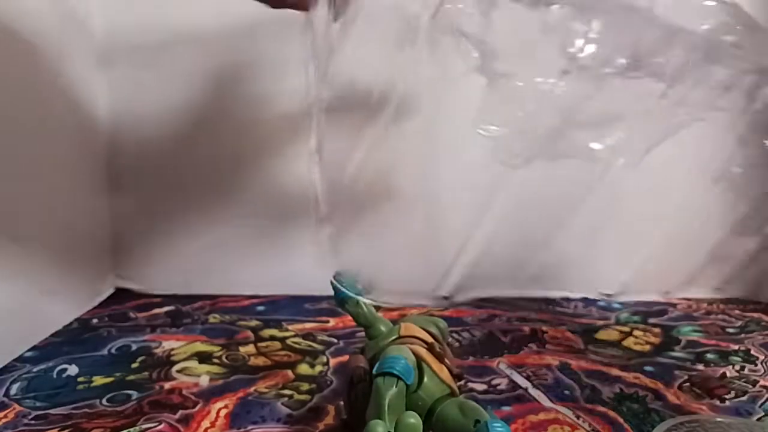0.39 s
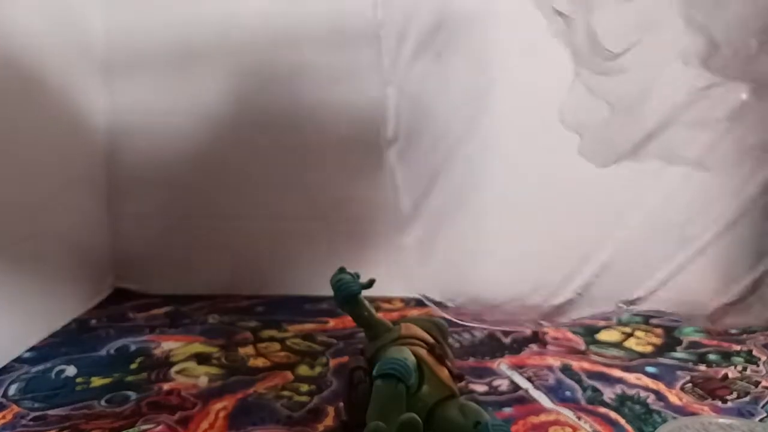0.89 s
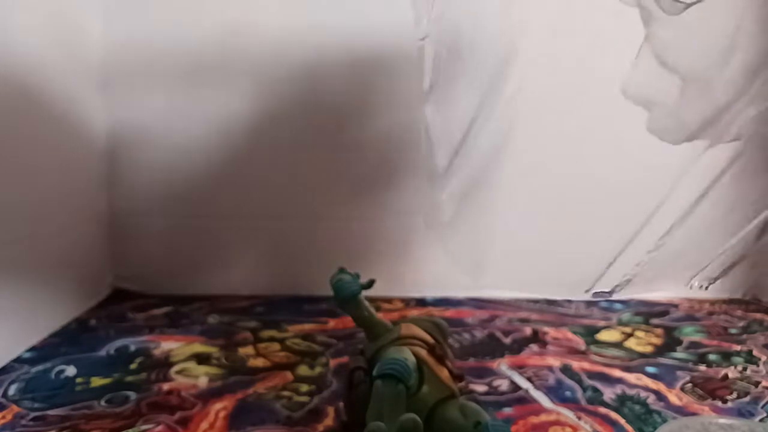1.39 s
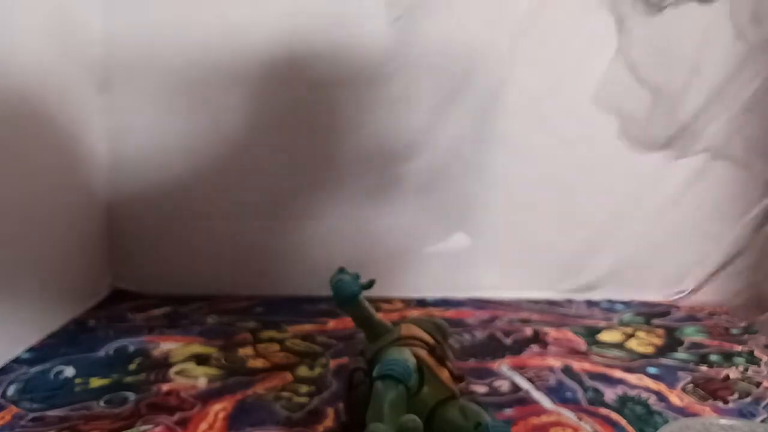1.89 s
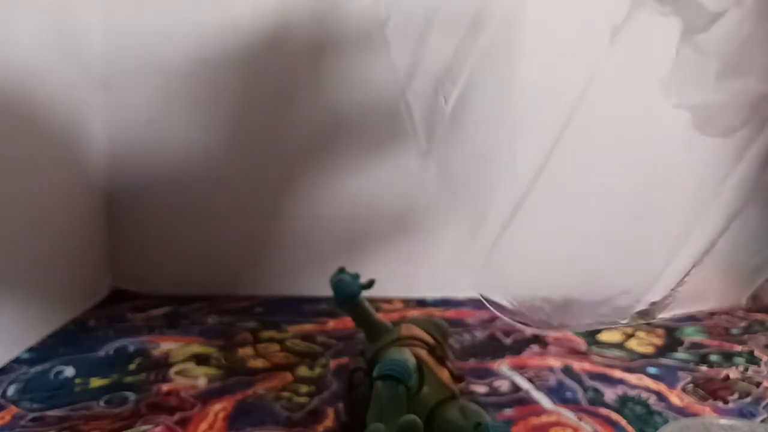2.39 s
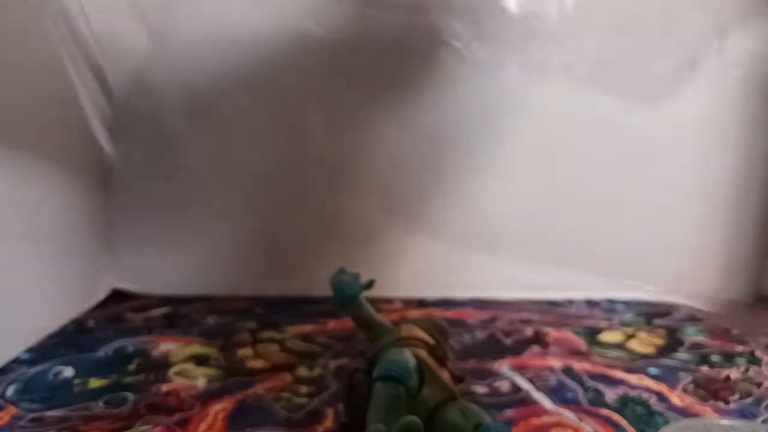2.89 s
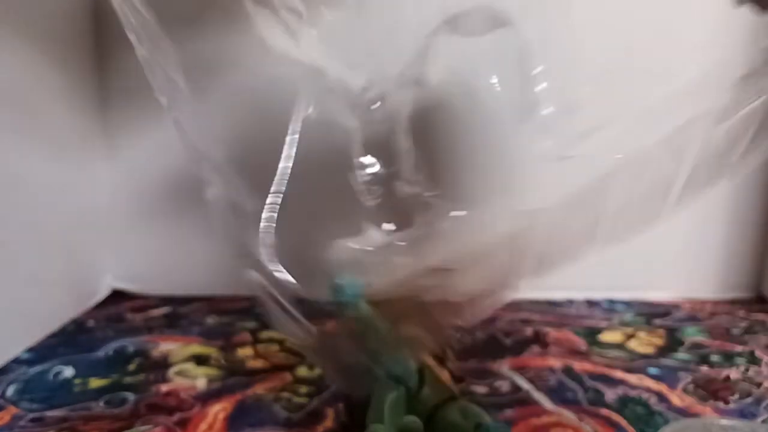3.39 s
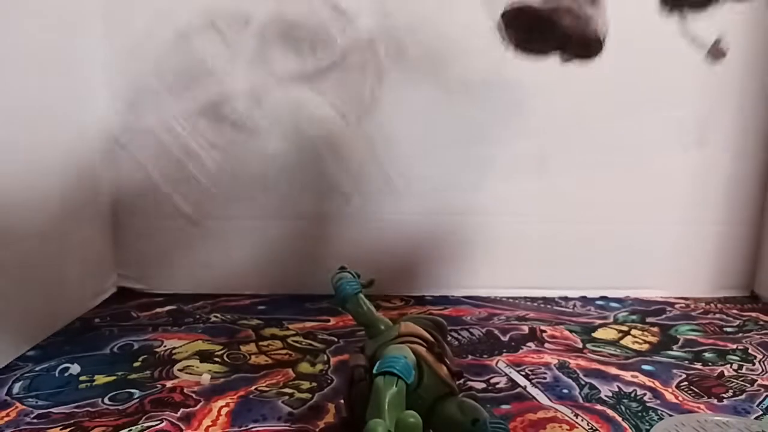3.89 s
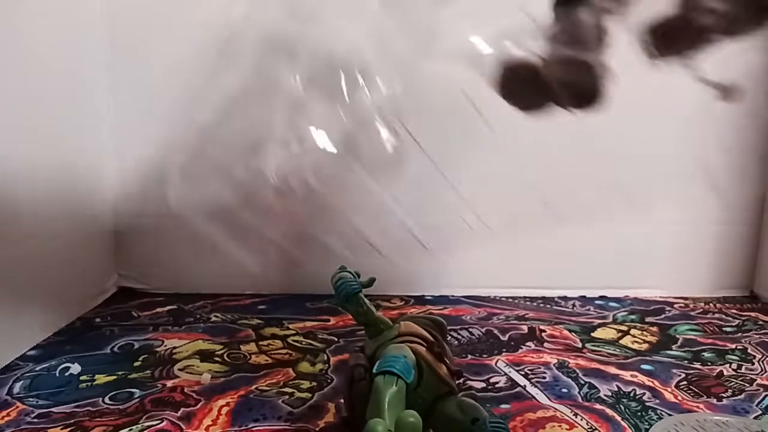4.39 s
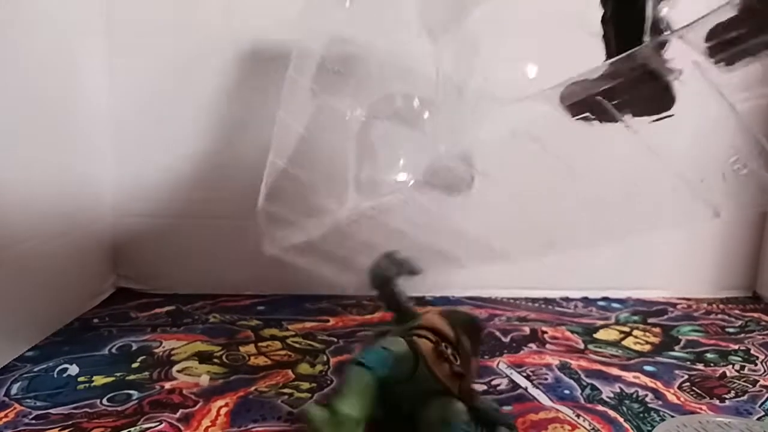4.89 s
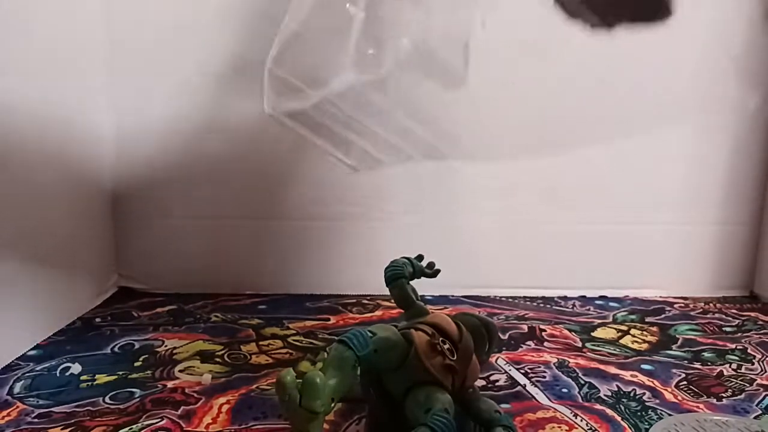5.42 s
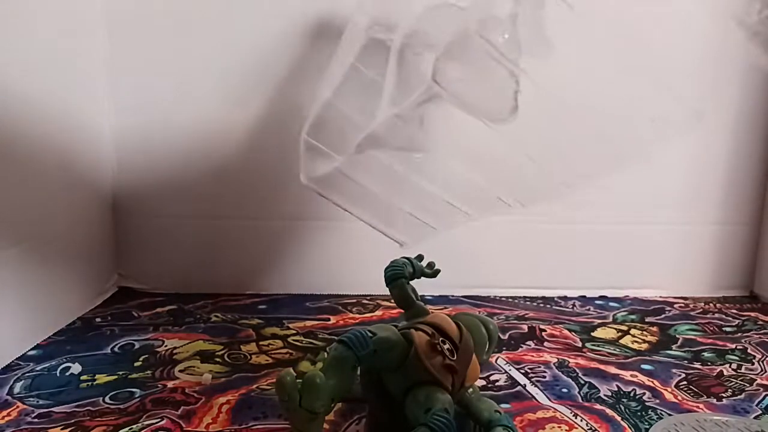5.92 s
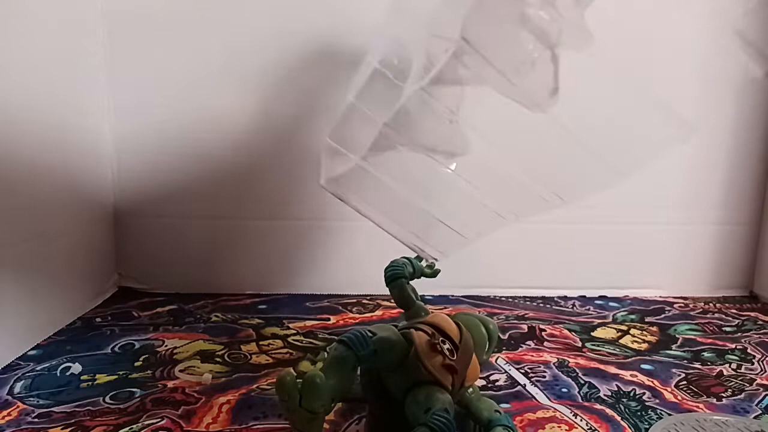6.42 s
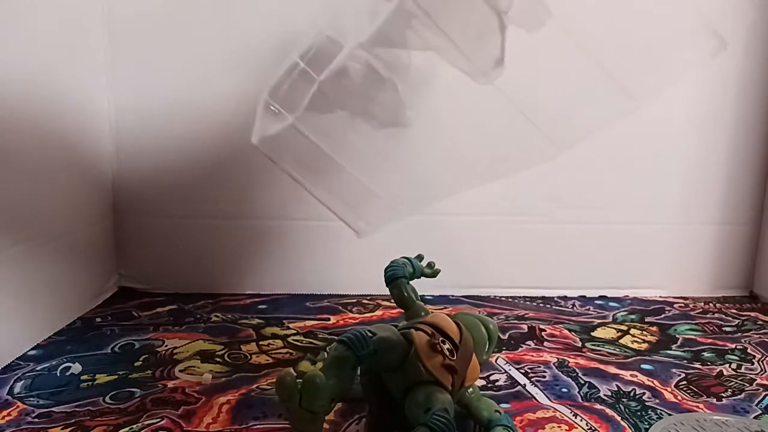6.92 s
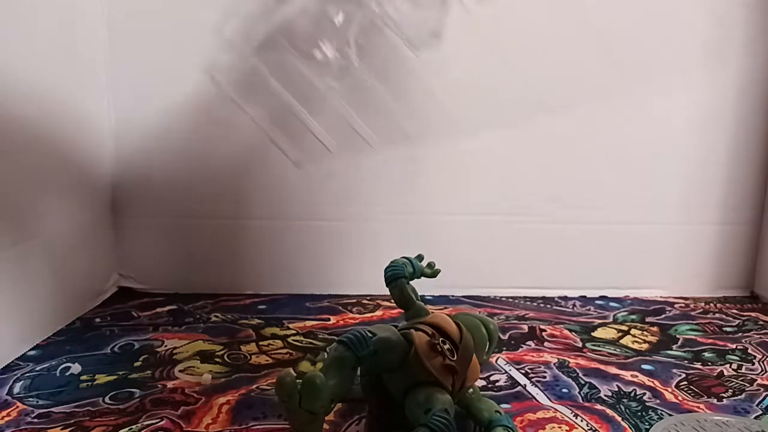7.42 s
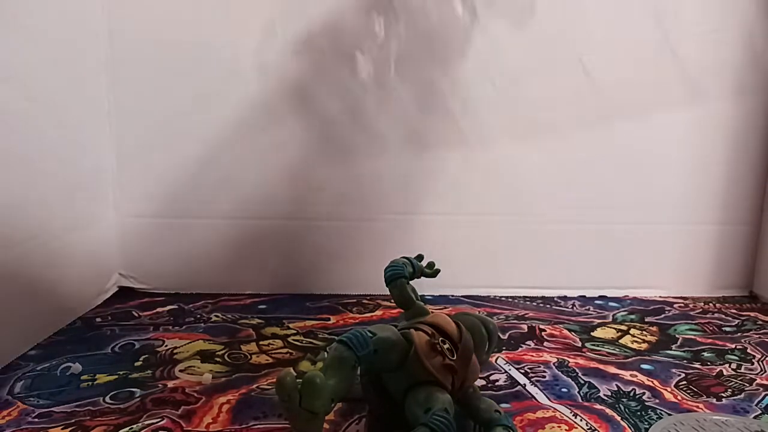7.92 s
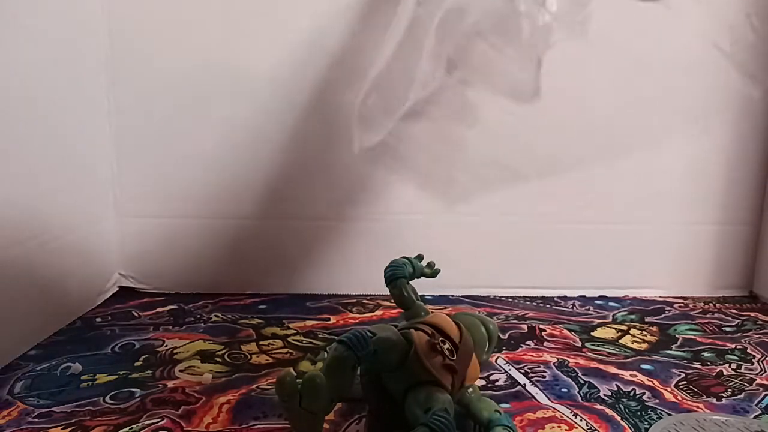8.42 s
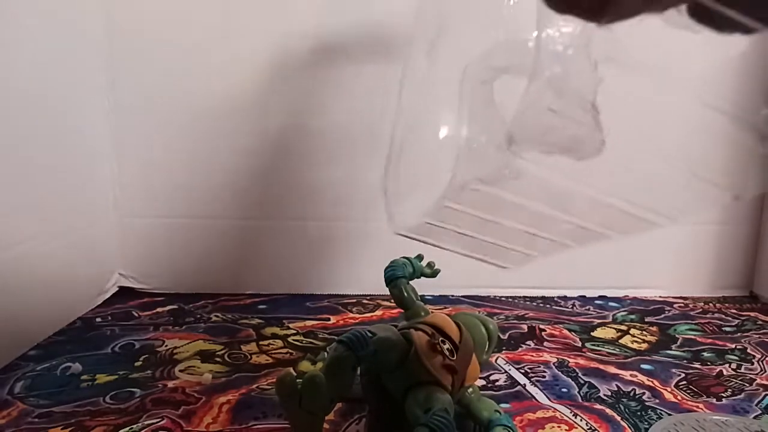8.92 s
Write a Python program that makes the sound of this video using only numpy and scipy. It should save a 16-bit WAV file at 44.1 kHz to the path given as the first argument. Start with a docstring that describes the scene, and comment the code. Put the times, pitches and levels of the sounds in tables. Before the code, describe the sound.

Faint ticks over a low wavering hum, then hard plastic packaging pops, cracks and scrapes loudly in uneven clusters inside a small box.

```python
"""A faint rustle with a few ticks over an unsteady hum opens the scene, then a hard, clear plastic tray is bent
and turned by hand inside a small open box, close to a stereo microphone. Its dents snap over as short noise
bursts through resonances, with treble cracks and booms of the tray; the box answers them with a noise tail.
Fingers and edges rustle and slide as shaped noise and grains, and low decaying sines thud in the table.
Under it all lie room noise and two close hums that beat."""
import sys
import numpy as np
from scipy import signal
from scipy.fft import rfft, irfft, next_fast_len
from scipy.io import wavfile
from scipy.ndimage import uniform_filter1d, map_coordinates

SR = 44100
rng = np.random.default_rng(int(sys.argv[2]) if len(sys.argv) > 2 else 0)


def convert_level_to_amplitude(level_db):
    """Map a level in decibels to its linear amplitude factor."""
    exponent = np.asarray(level_db, float) / 20
    return 10 ** exponent


def digitize_waveform(pressure):
    """Quantize a signal to 16-bit integers and store it at the path in sys.argv[1].

    Rows of a 2-D input are taken as channels; values are limited to [-1, 1].
    """
    field = np.atleast_2d(pressure).T
    bounded = np.clip(field, -1, 1)
    quanta = np.round(bounded * 32767).astype(np.int16)
    wavfile.write(sys.argv[1], SR, quanta)


N = 399088  # length in samples

# Treble colour of cracks and fizz: freq_hz [Hz], level_db [relative dB per Hz]
CRACK_COLOUR = [(1500, -14.5), (5000, -0.5), (8500, -4.5), (9500, -11), (12500, -4), (15500, -11.5)]
# Colour of the dragging scrape and its crackles: freq_hz [Hz], level_db [relative dB per Hz]
SCRAPE_COLOUR = [(150, -29), (350, 8.5), (580, -9), (1500, -6), (4000, -16), (8000, -39)]


def unit(x):
    """Scale to rms 1."""
    return x / np.sqrt(np.mean(x ** 2) + 1e-20)


def along(points, hz):
    """Read (Hz, value) points on a log frequency axis."""
    freq_hz, value = np.transpose(points)
    return np.interp(np.log(hz + 1), np.log(freq_hz + 1), value)


def wobble(rate):
    """A smooth random curve with rate knots a second."""
    knots = rng.standard_normal(int(N * rate / SR) + 4)
    return map_coordinates(knots, [np.arange(N) * rate / SR])


def filtered(x, response):
    """Pass x through a complex response of frequency."""
    m = next_fast_len(N + SR // 2)
    return irfft(rfft(x, m) * response(np.fft.rfftfreq(m, 1 / SR)), m)[..., :N]


def resonance(f, hz, width_hz):
    """Causal response of one damped mode."""
    return 1j * f * width_hz / (hz * hz - f * f + 1j * f * width_hz)


def hiss(spectrum):
    """Coloured stereo noise of rms 1 whose left-right likeness changes with frequency."""
    # Stereo likeness: freq_hz [Hz], likeness [correlation 0-1]
    likeness = [(60, 0.24), (250, 0.9), (600, 0.021), (1500, 0.68), (6000, 0.011)]

    def mid_side(hz):
        angle = np.arccos(np.clip(along(likeness, hz), -1, 1)) / 2
        return convert_level_to_amplitude(along(spectrum, hz)) * [np.cos(angle), np.sin(angle)]

    mid, side = filtered(rng.standard_normal((2, N)), mid_side)
    return unit(np.array([mid + side, mid - side]))


def room():
    """Unsteady room noise, and two motors humming a little apart so that their tones beat."""
    # Room noise colour: freq_hz [Hz], level_db [relative dB per Hz]
    air_colour = [(20, -29), (60, -2.5), (120, -14.5), (190, -10), (370, -6), (580, -28.5), (1600, -22.5),
                  (2800, -38), (15800, -48.5)]
    # Hum pair: upper pitch_hz [Hz], beat_rate [per s], crest_s [time of a beat crest, s]
    hum_pair = (120.5, 2.364, .39)
    # Brief dip of the background: start_s [s], end_s [s], depth_db [dB]
    dip = (7.64, 7.89, -18)
    hz, beat_rate, crest_s = hum_pair
    start_s, end_s, depth_db = dip
    t = np.arange(N) / SR
    phase = 2 * np.pi * hz * t + .6 * wobble(12)  # the pitch wavers
    second = .75 * np.cos(phase - 2 * np.pi * beat_rate * (t - crest_s))
    hum = np.sqrt(2) * convert_level_to_amplitude(-67 + 1.2 * wobble(5.0)) * (np.cos(phase) + second)
    air = convert_level_to_amplitude(-65 + 3 * wobble(8)) * hiss(air_colour)
    dip_db = uniform_filter1d(depth_db * ((t > start_s) & (t < end_s)), size=900)
    return convert_level_to_amplitude(dip_db) * (air + hum)


def thuds():
    """Low pushes travel through the table into the microphone as decaying sines, stronger on the right."""
    # Pushes: start_s [s], level_db [dB at onset, before panning], pitch_hz [Hz]
    pushes = [(2.376, -33, 84.3), (2.662, -31.5, 72.3), (3.36, -33, 133), (4.499, -40, 57),
              (7.009, -21, 63.6)]
    out, t = np.zeros(N + SR), np.arange(SR // 4) / SR
    for start_s, level_db, pitch_hz in pushes:
        push = convert_level_to_amplitude(level_db - 60 * t / 0.09) * np.sin(2 * np.pi * pitch_hz * t)
        out[round(start_s * SR):][:len(t)] += push
    return out[:N] * [[.55], [1.3]]


def swishes():
    """Skin slides smoothly on the film: noise swells, hisses evenly around its band and stops."""
    # Slides: start_s [s], length_s [s], level_db [dB rms before the swell], band_hz [Hz]
    slides = [(3.057, 0.12, -50, 1510), (3.085, .085, -51.5, 3290), (3.109, 0.061, -48.5, 920),
              (5.78, 0.049, -46.5, 7100), (6.477, 0.31, -54, 4740), (8.683, .28, -52, 4950)]
    out = np.zeros((2, N))
    for start_s, length_s, level_db, band_hz in slides:
        at, size = round(start_s * SR), round(length_s * SR)
        f = np.fft.rfftfreq(size, 1 / SR)
        band = resonance(f, band_hz, 0.25 * band_hz) + 0.079 * resonance(f, 5000, 9000)
        noise = unit(irfft(rfft(rng.standard_normal((2, size))) * band, size))
        swell = np.sin(np.pi * np.arange(size) / size) ** 0.25
        out[:, at:at + size] += convert_level_to_amplitude(level_db) * swell * noise
    return out


def effort():
    """Scrape and fizz levels in dB: strokes swell fast and fade out over the tray merely held."""
    # The tray merely held: time_s [s], scrape_db [dB], fizz_db [dB]
    held = [(0, -63.5, -53.5), (.4, -86, -75.5), (2.85, -73.5, -68.5), (3.5, -82, -75), (7.5, -69, -75),
            (7.85, -92, -87), (9.05, -78, -73)]
    # Strokes of fingers and edges: start_s [s], length_s [s], scrape_db [dB], fizz_db [dB]
    strokes = [(0, 0.083, -62, -83), (0.69, 0.16, -47.5, -64.5), (0.934, 0.2, -58, -69),
               (1.069, 0.14, -41, -60), (1.361, 0.094, -63.5, -66), (1.673, 0.18, -63.5, -61.5),
               (1.892, 0.32, -64.5, -68), (2.294, 0.53, -63, -71), (2.925, 0.47, -63.5, -67.5),
               (3.121, 0.22, -47, -68), (3.759, 0.32, -52, -74), (4.161, 0.04, -40.5, -57),
               (4.365, 0.34, -50.5, -86.5), (4.8, 0.3, -47, -59.5), (5.22, 0.11, -44.5, -55),
               (5.46, 0.4, -50, -60), (5.962, 0.19, -44.5, -48), (6.426, 0.34, -49.5, -52.5),
               (6.824, 0.33, -66.5, -75.5), (7.128, 0.21, -52.5, -61), (7.877, 0.49, -52, -88),
               (8.41, 0.28, -49.5, -91), (8.712, 0.23, -51.5, -55)]
    grip_s, let_go_db_per_s = 0.061, 165
    t = np.arange(0, N / SR + .01, .002)
    held_s, *held_db = np.transpose(held)
    start, length, *stroke_db = np.transpose(strokes)[:, :, None]
    swell = np.clip((t - start) / grip_s, 0, 1)
    shape = swell * convert_level_to_amplitude(-let_go_db_per_s * np.clip(t - start - length, 0, None))
    levels = []
    for rest_db, db in zip(held_db, stroke_db):
        gain = convert_level_to_amplitude(np.interp(t, held_s, rest_db)) + (convert_level_to_amplitude(db) * shape).sum(0)
        levels.append(np.interp(np.arange(N) / SR, t, 20 * np.log10(gain)))
    return levels


def creases(rate, spread_db, t60):
    """Gain for noise that bursts at random moments and decays by 60 dB in t60 seconds."""
    starts = (rng.random(N) < rate / SR) * convert_level_to_amplitude(spread_db * rng.standard_normal(N))
    return signal.lfilter([1], [1, -convert_level_to_amplitude(-60 / (t60 * SR))], starts)


def crackles():
    """Tiny creases pop at random under a drag, each a few cycles at its own pitch and place."""
    grains_per_s, spread_db = 200, 3.5
    count = round(grains_per_s * N / SR)
    when, pitch, size, place = rng.random((4, count))[:, :, None]
    hz, k = 500 * 12 ** pitch, np.arange(512)
    cycles = hz * k / SR
    gain = hz * convert_level_to_amplitude(along(SCRAPE_COLOUR, hz) - spread_db * np.log(size + 1e-9))
    pops = gain * np.sin(2 * np.pi * cycles) * cycles * np.exp(-2 * np.pi * cycles / 6)
    at = (when * N).astype(int) + k
    lag = np.round(20 * (place - .5)).astype(int) + 10  # samples
    sides = ((lag, .5 + place), (20 - lag, 1 + .5 - place))  # (delay, gain) left and right
    return unit(np.array([np.bincount((at + late).ravel(), (pops * share).ravel(), N + SR)[:N]
                          for late, share in sides]))


def rustle(scrape_db, fizz_db):
    """Skin and edges drag on the sheet: a lumpy, crackling scrape, a crinkling fizz and a shaken table."""
    # Handling carried by the table: freq_hz [Hz], level_db [relative dB per Hz]
    shake_colour = [(25, 0), (60, -0.5), (160, -2.5), (260, -35)]
    crinkle = creases(rate=90, spread_db=5, t60=0.03)
    drag = unit(convert_level_to_amplitude(2.5 * wobble(30)) * (1 + 2 * crinkle) * hiss(SCRAPE_COLOUR))
    scrape = drag * .5 + crackles()
    fizz = unit(convert_level_to_amplitude(6.0 * wobble(32)) * (1 + 1.3 * crinkle) * hiss(CRACK_COLOUR))
    shake = convert_level_to_amplitude(.5 * scrape_db - 39.0 + 5.0 * wobble(22.0)) * hiss(shake_colour)
    return convert_level_to_amplitude(scrape_db) * scrape + convert_level_to_amplitude(fizz_db) * fizz + shake


def strays(scrape_db, fizz_db):
    """Ticks at random moments, each with its own pitch, their strength following the stroke under them."""
    ticks_per_s, over_scrape_db, spread_db = 30, 8, 3
    at = rng.integers(200, N - 200, int(ticks_per_s * N / SR))
    size, pitch, boom = rng.standard_normal((3, len(at)))
    peak_db = scrape_db[at] + over_scrape_db + spread_db * size
    crack_db = fizz_db[at] - scrape_db[at] - 8.0
    return np.transpose([at / SR, peak_db, 1500 * np.exp(.3 * pitch), -18 + 6 * boom, crack_db])


def aftershocks(rows):
    """Neighbouring creases give way: each row sets off two softer ticks with less crack as the sheet settles."""
    within_s, softer_db = .06, -15  # some fall up to 10 dB lower still
    s, db, _, boom_db, crack_db = np.transpose([*rows, *rows])
    late, size, pitch = rng.random((len(s), 3)).T
    peak_db = db + softer_db - 10 * size
    return np.transpose([s + within_s * late, peak_db, 1000 * 2 ** pitch, boom_db, crack_db - 9.5])


def snaps(stray_rows):
    """Dents buckle in bursts of a few ms that ring a few rough cycles, crack in the treble and boom the tray."""
    # Dents snapping over: peak_s [s], peak_db [dB before a random stereo tilt], pitch_hz [Hz],
    # boom_db [tray drive, dB re peak, before a common boost], crack_db [dB re peak_db]
    dents = [(0.393, -40, 406, -0.5, -50), (0.41, -38, 390, 0, -50), (0.841, -42, 1150, -3, -13),
             (1.108, -20.5, 1780, -11, -38), (1.165, -9.5, 2120, -41, -15), (1.174, -11, 2090, -39, -3),
             (1.183, -7.5, 2500, -24, -7), (1.382, -23.5, 2540, -50, -17), (2.331, -16.5, 3000, -11.5, -41),
             (2.372, -4.5, 1120, -17.5, -32), (2.405, -19, 820, -14, -35), (2.637, 0, 1710, -11, -31),
             (2.726, -37, 4630, -23, 19), (3.182, -29, 2140, -4.5, -7), (3.301, -14.5, 1720, -8, -9),
             (3.361, -19.5, 1100, -1, -12.5), (3.397, -31.5, 2280, 2.5, 3), (3.508, -40.5, 890, 4.5, -32),
             (3.604, -42, 830, 4, -46.5), (4.183, -13.5, 1130, -9.5, -17.5), (4.2, -28.5, 1300, 0.5, -27),
             (4.252, -23.5, 1200, -20, -35), (4.465, -19, 2370, -34, -7), (4.475, -14.5, 1740, -14, -21),
             (4.492, -11, 1990, -20, -32), (4.508, -18.5, 3500, -3, 7), (4.832, -17, 3040, -12, -23),
             (4.853, -20.5, 1530, -10, -12.5), (5.022, -29.5, 1040, 1, -18.5), (5.05, -28, 1140, 4, -18),
             (5.085, -9, 1940, -25, -23), (5.295, -17.5, 2000, -32, -0.5), (5.455, -10, 2600, -23, -10.5),
             (5.545, -6, 1220, -23, -53), (5.574, -2, 1770, -13.5, -32), (5.72, -16, 1260, -9.5, -39),
             (5.763, -27.5, 840, -14, -34), (5.79, -23.5, 407, 0.5, -23), (5.833, -22.5, 940, -25, -38),
             (5.954, -15.5, 3770, -40, -3), (5.993, -8.5, 2300, -44, -7.5), (6.349, -12, 1960, -33, -44),
             (6.472, -16.5, 1920, -39, -29), (6.679, -11.5, 1400, -37, -20), (6.695, -0.5, 2460, -43, -33),
             (6.709, -20, 2970, -34, 4.5), (6.912, -17.5, 1390, -20, -7.5), (7.008, -17.5, 1470, -10, 2.5),
             (7.339, -12.5, 2530, -23, -18), (7.38, -7.5, 1510, -36, -10.5),
             (7.402, -16.5, 3260, -41, -10.5), (7.463, -22.5, 1090, -4, -33),
             (7.487, -18, 1267, -9.5, -35.5), (7.538, -3, 2020, -45, -16), (7.546, -5.5, 2800, -26.5, -9),
             (7.979, -14.5, 1250, -27, -20), (8.156, -9.5, 1370, -28, -21), (8.18, -3.5, 3700, -51, -11),
             (8.206, -19.5, 1480, -33, -6), (8.58, -16.5, 2820, -19.5, -5), (8.683, -15, 3140, -31, -8),
             (8.858, -25.5, 1140, -15, -27), (8.978, -12.5, 3230, -32, -21)]
    # More snaps, all pitched near 1600 Hz with a weak boom: peak_s [s], peak_db [dB, as above],
    # crack_db [dB re peak_db]
    more_snaps = [(0.043, -63, 19.5), (0.067, -39.5, -2), (0.118, -60, 18), (0.126, -59.5, 18),
                  (0.249, -60, 16), (0.694, -43.5, -6.5), (0.736, -27.5, -12.5), (0.794, -29, -16.5),
                  (1.048, -38, -27), (1.072, -35, -29), (1.096, -26, -23), (1.12, -21, -30),
                  (1.133, -20.5, -33), (1.364, -30.5, -15), (1.417, -35, -14), (1.866, -29, -11.5),
                  (2.154, -36.5, -13), (2.207, -28.5, -26), (2.226, -42.5, 1.5), (2.317, -27.5, -15),
                  (2.359, -28, 8), (2.484, -44, 4), (2.545, -48, 7), (2.597, -27.5, -26),
                  (3.217, -27, -21.5), (3.245, -40, 0.5), (3.282, -27.5, -4), (3.798, -34, -7.5),
                  (3.859, -27, -11.5), (3.916, -32.5, -9), (4.037, -32, -13), (4.064, -50, 5),
                  (4.273, -31, -28), (4.334, -34, -10.5), (4.422, -35, -4.5), (4.666, -28, -49),
                  (4.731, -33.5, -45), (4.946, -39, -4.5), (4.959, -39, 2.5), (5.256, -39.5, -2),
                  (5.362, -34, -4), (5.417, -31.5, -28), (5.444, -13, -7), (5.523, -7.5, -39),
                  (5.919, -29, -29), (5.925, -10, -3), (6.12, -17.5, -36), (6.166, -15, -20.5),
                  (6.229, -25, -22), (6.255, -27.5, -12.5), (6.292, -24, -16), (6.446, -29, -16.5),
                  (6.512, -28.5, -26.5), (6.57, -23, -20.5), (6.657, -22, -34), (6.834, -28.5, -36.5),
                  (6.935, -32, -1), (7.055, -25.5, -16), (7.067, -19, -16.5), (7.226, -23.5, -26),
                  (7.295, -18.5, -33), (7.5, -5, -11.5), (7.563, -16.5, -6.5), (7.9, -28, -10),
                  (8.018, -24.5, -41), (8.093, -17.5, -18), (8.313, -23, -17), (8.32, -20, -9),
                  (8.346, -26.5, -31), (8.4, -33.5, -30), (8.431, -11, -20), (8.484, -23.5, -29),
                  (8.497, -27, -30), (8.557, -19, -47), (8.973, -21.5, -31.5), (9.001, -8.5, -11.5)]
    # Table top, then broad bending of the tray: pitch_hz [Hz], width_hz [Hz], level_db [dB]
    tray_modes = [(67, 46, -2.5), (239, 20, -2.5), (327.4, 21, 3), (423, 18, 1), (900, 440, -9)]
    size, rise = 2048, .004  # samples, s
    t, f = np.arange(size) / SR, np.fft.rfftfreq(size, 1 / SR)
    burst = np.where(t < rise, convert_level_to_amplitude(-15000 * (rise - t)), convert_level_to_amplitude(-60 * (t - rise) / 0.024))
    flutter = convert_level_to_amplitude(-60 * t / 0.069)  # the sheet keeps crumpling as it settles
    ring, crack_gain, blows = np.zeros((3, 2, N + SR))
    pitched = [(s, db, 1600 * np.exp(rng.normal(0, 0.033)), -26, crack_db) for s, db, crack_db in more_snaps]
    struck = [*dents, *pitched]
    for s, db, hz, boom_db, crack_db in [*struck, *stray_rows, *aftershocks(struck)]:
        at = round((s - rise) * SR)
        tilt = convert_level_to_amplitude(rng.normal(0, 1) * np.array([[1], [-1]]))
        shared, *own = rng.standard_normal((3, size))
        # two resonances: steep skirts keep dull snaps dull
        dent = resonance(f, hz, hz) * resonance(f, 0.85 * hz, 0.6 * hz)
        pop = irfft(rfft(burst * (shared + 1.47 * np.array(own))) * dent, size)
        ring[:, at:at + size] += tilt * convert_level_to_amplitude(db) * pop / np.abs(pop).max()
        crack_gain[:, at:at + size] += tilt * convert_level_to_amplitude(db + crack_db) * burst
        blow = convert_level_to_amplitude(db + boom_db + 16.5) * flutter * rng.standard_normal(size)
        blows[rng.integers(2), at + round(rise * SR):][:size] += blow

    def tray_body(hz):
        detuned = hz * [[.94], [1.06]]  # the grip detunes the tray blow by blow
        modes = sum((-1) ** k * convert_level_to_amplitude(db) * resonance(detuned, mode_hz, width_hz)
                    for k, (mode_hz, width_hz, db) in enumerate(tray_modes))
        return modes * resonance(hz, 510, 1300)  # softens the start

    boom = filtered(blows[:, :N], tray_body).sum(0)
    return ring[:, :N] + crack_gain[:, :N] * hiss(CRACK_COLOUR) + boom


def box(x):
    """The box answers with a decaying noise tail, redrawn every 0.2 s as the tray moves."""
    # Decay of the answer: freq_hz [Hz], t60_s [s]
    decay = [(300, 0.21), (5000, 0.21)]
    out, step, delay = np.zeros((2, N + SR)), SR // 5, 130  # samples
    for at in range(0, N, step):
        hz, t, z = signal.stft(rng.standard_normal((2, SR // 3)), SR, nperseg=256)
        fade = convert_level_to_amplitude(-60 * t / along(decay, hz)[:, None])
        tail = signal.istft(z * fade, SR, nperseg=256)[1]
        wet = signal.fftconvolve(x[:, at:at + step], tail / np.linalg.norm(tail[0]), axes=1)
        out[:, at + delay:at + delay + wet.shape[1]] += wet
    return out[:, :N]


def scene():
    """Room, table and handling under the snapping tray and the box's answer."""
    scrape_db, fizz_db = effort()
    background = room() + thuds()
    handling = swishes() + rustle(scrape_db, fizz_db)
    tray = snaps(strays(scrape_db, fizz_db))
    return background + handling + tray + convert_level_to_amplitude(-10.0) * box(tray)


def roll_off(x):
    """The treble ends steeply here."""
    return signal.sosfilt(signal.butter(12, 16980, fs=SR, output="sos"), x)


def record(dry):
    """Uneven microphone ports, weak in deep bass and cut off in the top treble, clip at full scale."""
    # Uneven ports: freq_hz [Hz], left_minus_right_db [dB]
    port_lean = [(100, -0.5), (350, 3), (600, -2), (1400, 1.5), (9000, 6)]

    def ports(hz):
        lean = convert_level_to_amplitude(along(port_lean, hz) / 2 * np.array([[1], [-1]]))
        treble_cut = (hz < 16800) / (1 + (hz / 15900) ** 60)
        bass_cut = (hz / (hz - 30j)) ** 2
        return lean * treble_cut * bass_cut

    mix = np.clip(filtered(dry, ports), -1, 1)
    return roll_off(mix)


dry = scene()
out = record(dry)
digitize_waveform(out)
```